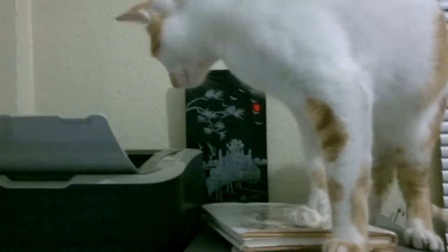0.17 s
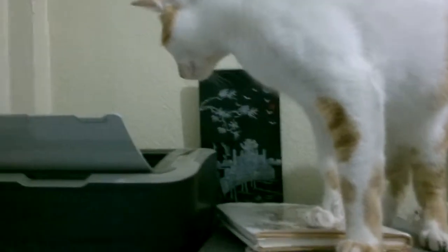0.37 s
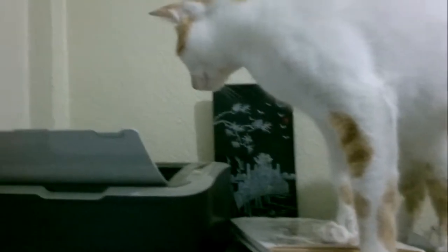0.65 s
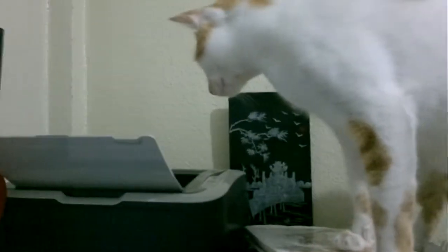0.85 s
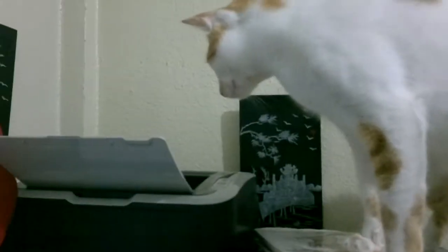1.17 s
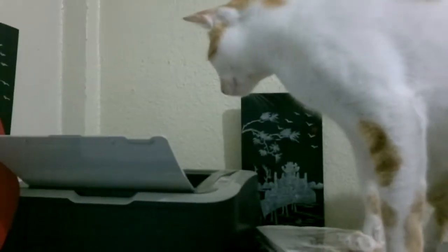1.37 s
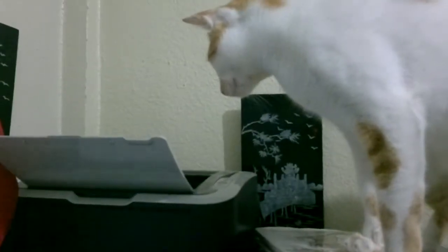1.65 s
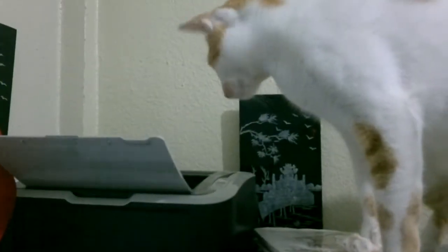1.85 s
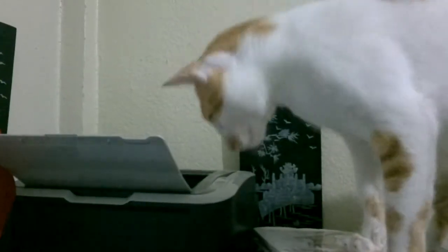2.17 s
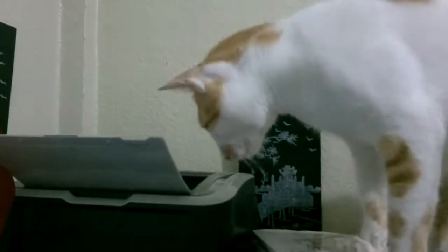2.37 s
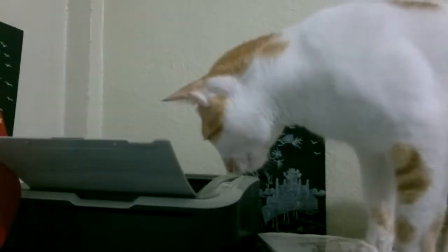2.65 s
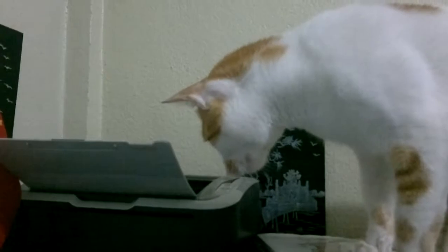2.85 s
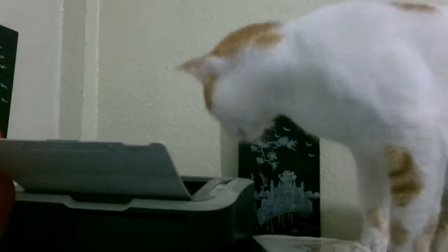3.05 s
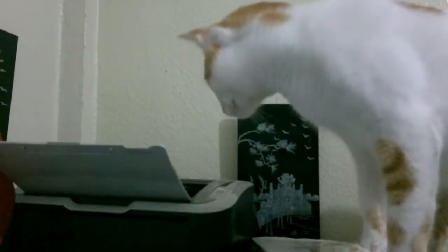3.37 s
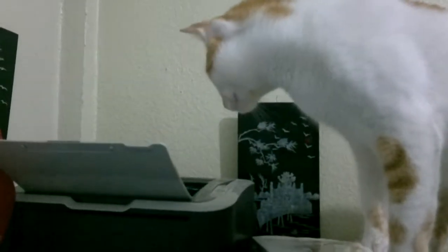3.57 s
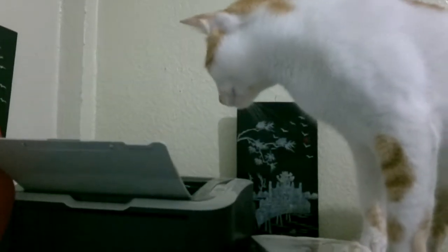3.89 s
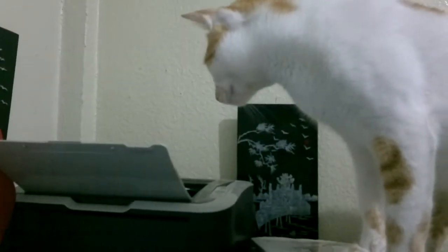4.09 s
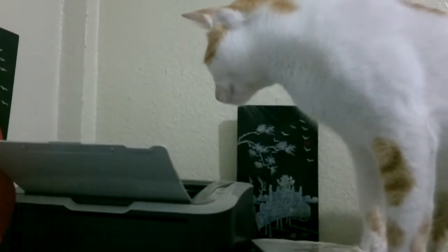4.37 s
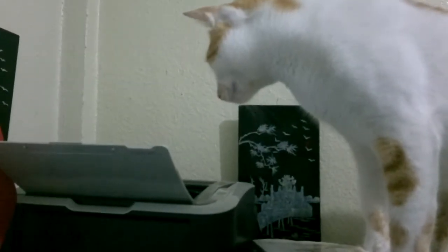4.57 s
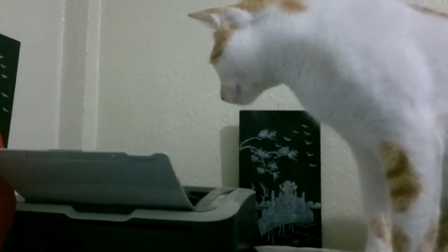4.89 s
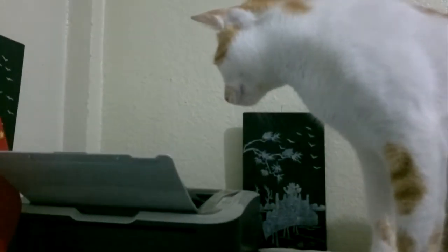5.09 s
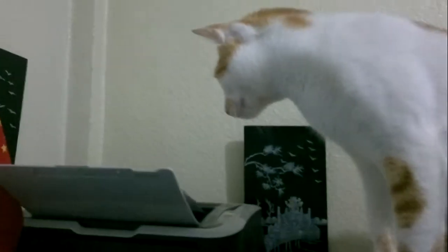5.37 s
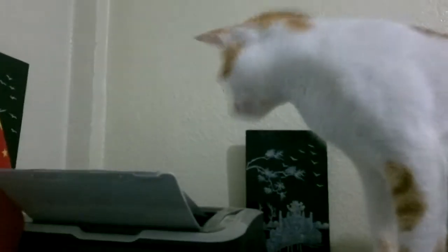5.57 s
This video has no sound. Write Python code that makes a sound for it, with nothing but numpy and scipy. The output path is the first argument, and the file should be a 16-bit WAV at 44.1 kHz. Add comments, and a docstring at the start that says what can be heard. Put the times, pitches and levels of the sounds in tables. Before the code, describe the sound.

Steady fan rush and gear whir from a desktop printer, with a short rising motor whine, plastic clicks, paper rubs and a brief scrape.

```python
"""In a small room, a desktop laser printer starts a job close to a pair of microphone ports.
Fan, gears and rollers are shaped noise and steady tones; the motor winds up as a rising tone.
Clutches, levers, gear teeth and the sheet's edge clack or tick as noise bursts that ring the
plastic case, and a small spring pings. The sheet rubs and scrapes as noise while it is dragged in;
low tones of the case swell, and handling noise adds soft bumps."""
import sys
import numpy as np
from scipy import signal
from scipy.fft import rfft, irfft
from scipy.io import wavfile

SR = 44100
rng = np.random.default_rng(int(sys.argv[2]) if len(sys.argv) > 2 else 0)


def output_pcm(signal):
    """Save a mono or channel-first signal as 16-bit PCM at the path in sys.argv[1].

    Samples are clipped to [-1, 1] before scaling.
    """
    pcm = np.clip(np.atleast_2d(signal).T, -1, 1) * 32767
    wavfile.write(sys.argv[1], SR, np.round(pcm).astype(np.int16))


N = 252693
TIME = np.arange(N) / SR
FREQS = np.maximum(np.arange(N // 2 + 1) * SR / N, 1)

# Noise colours of air rush, gear whir and roller hiss: (frequency [Hz], level per Hz [dB])
AIR_COLOUR = [(25, -21), (70, -33), (110, -20.5), (150, -16.5), (205, -13.5), (270, -3), (360, -4),
              (500, -3), (720, -4), (950, -8), (1320, -15), (1620, -22), (2600, -22)]
WHIR_COLOUR = [(1000, 1.5), (1620, -1), (1780, -1.5), (2100, -1), (2650, -7), (3000, 3), (4400, 0.5),
               (5000, -7), (6000, -10), (7500, -22)]
HISS_COLOUR = [(6000, -5.5), (8000, 3), (11000, 3.5), (15500, -8)]
# Noise colours of the sliding sheet and of its edge: (frequency [Hz], level per Hz [dB])
PAPER_COLOUR = [(600, 13), (1000, 12.5), (2300, 3), (3300, 11.5), (4400, 5), (5300, -8), (6500, -10.5),
                (8000, -30)]
PAPER_EDGE_COLOUR = [(4500, 8.5), (6500, 6.5), (9000, 3), (12000, -1), (15500, -11)]
# Noise colours of the three parts of a clack: (frequency [Hz], level per Hz [dB])
KNOCK_COLOUR = [(150, -59), (340, 3), (600, 3.5), (900, 8), (1350, 4), (1850, -1), (2500, -26)]
CRACK_COLOUR = [(1300, 0), (2000, 4), (2600, 2.5), (3200, 7.5), (4200, 5.5), (5200, -10), (6400, -11.5),
                (8000, -36)]
SNAP_COLOUR = [(5000, 13.5), (7000, 7), (8500, 1.5), (10500, 1.5), (13000, -5), (15500, -16)]
# Noise colours of a handling bump, deep and hollow: (frequency [Hz], level per Hz [dB])
DEEP_COLOUR = [(22, -23), (45, 8), (90, -6), (160, 0)]
HOLLOW_COLOUR = [(140, -16), (300, 6.5), (500, -3), (800, 2)]

# Gear mesh and motor steps: (multiple of MESH_HZ [-], relative level [dB])
MESH_ORDERS = [(2, -52.5), (3, -47), (6, -53.5), (12, -65), (30, -66), (36, -71)]
# Steady tones of fan and bearings: (frequency [Hz], level [dB])
FAN_TONES = [(360.3, -50.5), (585, -42.5)]
# Thin whines of the scanner: (frequency [Hz], level before SCANNER_DB [dB])
SCANNER_TONES = [(4678, -67), (10928, -73), (12189, -73.5)]
# Low tones of the case: (frequency [Hz], crest level [dB], crest time [s], swell rate [dB/s])
DRONE_TONES = [(59.5, -55.5, 5.2, 5.5), (85.3, -51, 5.42, 37), (137.6, -63, 5, 6), (191.4, -56.5, 6.2, 1.5)]
# Load on the gear train, read against WORKING_DB: (time [s], level [dB])
GEAR_LOAD = [(0.62, -48.5), (1.25, -48), (1.4, -47), (1.89, -39.5), (2.06, -45), (4.63, -42), (5.05, -46),
             (5.49, -46), (5.73, -44)]

# Clutches, levers and gear teeth catching, and ticks of the sheet's edge, levels relative within
# each part: (time [s], crack [dB], knock [dB], snap [dB], pitch of struck part [Hz],
# basic chatter t60 [s])
CLACKS = [(0.5254, -18, -21.5, -48, 860, 0.027), (0.543, -26.5, -28, -54, 600, 0.06),
          (1.2135, -19, -17, -37, 930, 0.024), (1.2281, -13.5, -15, -34.5, 1084, 0.023),
          (1.294, -24, -27.5, -46, 960, 0.023), (1.3145, -30, -28, -32, 930, 0.011),
          (1.4195, -20, -20.5, -29, 950, 0.016), (1.426, -36, -25.5, -48, 970, 0.011),
          (1.6932, -29, -20.5, -44, 942, 0.041), (1.928, -25, -31, -42, 3480, 0.039),
          (1.9521, -18, -13, -41, 966, 0.039), (1.9805, -8.5, -16, -33, 856, 0.03),
          (1.9912, -10, -12, -23.5, 845, 0.019), (3.3458, -29, -25, -63, 687, 0.11),
          (4.241, -23, -22, -42, 1690, 0.016), (4.2925, -14.5, -17, -44, 1790, 0.028),
          (4.333, -16, -22, -34, 1900, 0.032), (4.3688, -17.5, -18, -36, 945, 0.014),
          (4.522, -24, -28, -37.5, 5030, 0.038), (4.598, -21, -24, -39, 4900, 0.024),
          (4.661, -21, -27, -38, 1300, 0.054), (4.681, -18, -24.5, -35, 1500, 0.029),
          (4.735, -26, -48, -43, 1300, 0.027), (5.5655, -16, -26, -37.5, 2870, 0.053),
          (5.587, -19, -28, -35.5, 765, 0.056), (5.639, -22, -25, -49, 677, 0.031),
          (5.7141, -26.5, -26, -48, 1550, 0.03)]
# Ringing modes of the plastic case: (frequency [Hz], relative level [dB], t60 [s])
CASE_MODES = [(376.5, -14, 0.23), (575, -22.5, 0.31), (664, -19, 0.22), (843, -13.5, 0.15),
              (947, -19.5, 0.17), (1082, -18.5, 0.087), (1335, -17, 0.19), (1510, -20.5, 0.13),
              (1820, -13.5, 0.11), (2175, -26, 0.25), (2680, -25, 0.12), (3580, -38, 0.18),
              (4590, -21.5, 0.14)]
# A small spring pings as a lever flips: (time [s], strength [dB])
SPRING_PINGS = [(4.526, -26.5), (4.668, -24), (4.7365, -24)]
# Ringing modes of that spring: (frequency [Hz], relative level [dB], t60 [s])
SPRING_MODES = [(3870, -7.5, 0.059), (3910, -12.5, 0.12), (3930, -14.5, 0.24), (4400, -17, 0.087)]
# Panel resonances that the motor sweeps through: (frequency [Hz], width [Hz], lift [dB])
PANELS = [(310, 6.8, 10), (410, 22, 9.5), (530, 88, 7)]
# The sheet rubs on the rollers, levels before the slide level and ticks: (firmest grip [s],
# rise [s], fade [s], rub [dB], edge hiss [dB], rasp [dB], rasp pitch [Hz])
RUBS = [(0.388, 0.015, 0.032, -37, -54.5, -54, 3680), (1.335, .004, .008, -44, -38, -36, 3500),
        (1.345, 0.051, 0.096, -28.5, -38.5, -35.5, 4310), (1.592, 0.005, 0.017, -39, -54, -42, 6100),
        (1.64, .1, 0.16, -40.5, -48, -52, 3770), (1.697, 0.017, 0.028, -33, -59, -46, 3710),
        (1.743, 0.007, 0.014, -40, -47, -36, 3830), (1.847, 0.0043, 0.012, -45, -47, -33, 3590),
        (1.869, 0.0067, 0.032, -31, -44, -35.5, 3480), (3.015, 0.036, 0.057, -35.5, -70, -54, 3860),
        (4.687, 0.021, 0.024, -47, -40.5, -43, 5980)]
# The hand shifts on the microphone: (time [s], deep level [dB], hollow level [dB], length [s])
BUMPS = [(0.394, -49, -35.5, 0.038), (0.574, -48.5, -33, 0.041), (0.875, -49, -41, 0.036),
         (4.855, -47, -54, 0.034)]

# Balance of the two ports: (frequency [Hz], left minus right [dB])
STEADY_BALANCE = [(60, -6.5), (250, -4.5), (900, -4), (1900, -1.5), (3100, -9), (4200, -1.5), (5300, 9),
                  (7000, 10), (12000, 23.5)]
CLACK_BALANCE = [(250, -1.5), (1000, -4), (1900, 0), (3000, -8), (4800, 0.5), (6800, -0.5), (9000, 5),
                 (13000, 14)]
# How alike spread-out sound is at the two ports: (frequency [Hz], likeness [0 to 1])
LIKENESS = [(30, .55), (100, .8), (300, .94), (850, .89), (1300, .65), (1800, .45), (2300, .68), (3300, .3),
            (4100, .45), (6000, .2), (12000, .05)]
# How much earlier sound reaches the left port: (frequency [Hz], lead [ms])
PORT_LEAD = [(300, 0.11), (1200, 0.095), (2200, 0.19), (4000, 0.244)]

ROOM_T60_S, ROOM_DB = 0.19, 3.5
CUTOFF_HZ, PANEL_CUT_HZ = 15800, 260
# The load starts idle and rises to the load table, getting there as the motor starts.
WORKING_DB, IDLE_DB, TAKE_UP_S = -42.5, -58, 0.29
# "Follows" is the share of the load's swing, in dB, that a level takes on.
AIR_DB, AIR_FOLLOWS = -37, 0.08
MESH_HZ, MESH_DB, MESH_FOLLOWS = 140.1, 6, 0.73
SCANNER_DB, SCANNER_SPIN_UP_S = 1, 1.6
DRONE_IDLE_DB = -22.5  # lowest level, relative to the crest
FAN_HISS_HZ, FAN_HISS_WIDTH_HZ, FAN_HISS_DB = 5110, 900, -59.5
FAN_HISS_SAG_HZ_PER_S, FAN_HISS_SAG_S = 490, 0.56
# The motor starts, labours at its lowest pitch, then gains speed until the gears run steadily.
MOTOR_ON_S, SPEED_UP_S, AT_SPEED_S, SETTLE_S = 0.575, 0.613, 0.86, 0.12
START_HZ, RISE_HZ_PER_S, RUN_UP_DB = 312, 1700, -42
EDGE_SHARPNESS, RASP_WIDTH_HZ = 0.96, 520  # edge hiss rises as this power of the grip
KNOCK_NOISE_DB, STIFF_MODES_HZ = -6.5, 2500
PART_DB, PART_T60_CYCLES = 4, 42
SCRAPE_S, SCRAPE_LENGTH_S, SCRAPE_DB = 4.503, 0.162, -34.5
SCRAPE_HZ, SCRAPE_END_HZ, SCRAPE_SAG_S, SCRAPE_WIDTH_HZ = 1180, 830, 0.055, 190


def from_db(db):
    """Turn decibels into gain."""
    return 10 ** (np.asarray(db) / 20)


def rms_one(x):
    """Scale a sound to an rms (average strength) of one."""
    return x / np.sqrt(np.mean(x ** 2) + 1e-20)


def in_time(rows):
    """Read each column of a timed table at every sample."""
    s, *columns = np.transpose(rows)
    return [np.interp(TIME, s, column) for column in columns]


def over_hz(points):
    """Read a table at every frequency, on a log axis."""
    hz, value = np.transpose(points)
    return np.interp(np.log(FREQS), np.log(hz), value)


def drift(rate):
    """Random wander of rms one: `rate` new values a second, held once all 2000 are used."""
    knots = rng.standard_normal(2000)
    return rms_one(np.interp(TIME * rate, np.arange(len(knots)), knots))


def noise(spectrum, grain_db=0):
    """Two unrelated noises of one colour, steep beyond its ends; uneven sample sizes add grit."""
    grain = from_db(grain_db * np.minimum(rng.exponential(1, N), 6))
    white = rng.standard_normal((2, N)) * grain
    low_edge = np.minimum(FREQS / spectrum[0][0], 1) ** 3
    high_edge = np.minimum(spectrum[-1][0] / FREQS, 1) ** 4
    return rms_one(irfft(rfft(white) * from_db(over_hz(spectrum)) * low_edge * high_edge, N))


def resonant_noise(hz, width_hz, order=2):
    """Noise of rms one in a resonance whose centre may move."""
    low = signal.butter(order, width_hz / 2, fs=SR, output="sos")
    a, b = signal.sosfilt(low, rng.standard_normal((2, N)))
    turn = 2 * np.pi * np.cumsum(hz * np.ones(N)) / SR
    return rms_one(a * np.cos(turn) + b * np.sin(turn))


def sine(hz):
    """A tone of rms one along a pitch curve."""
    return np.sqrt(2) * np.sin(2 * np.pi * (np.cumsum(hz) / SR + rng.random()))


def tones(lines, wobble, flutter_db):
    """Tones of one shaft share its wobble in speed but flutter in level on their own."""
    speed = 1 + wobble * drift(12)
    return sum(from_db(db + flutter_db * drift(9)) * sine(hz * speed) for hz, db in lines)


def ring(clicks, hz, t60):
    """Each click sets off a dying sine; a click of one starts it at a height of one."""
    r = from_db(-60 / (t60 * SR))
    w = 2 * np.pi * hz / SR
    return signal.lfilter([0, np.sin(w)], [1, -2 * r * np.cos(w), r * r], clicks + 1e-18)


def gate(start, end, attack_s, release_s):
    """Fade in, hold and fade out between two times."""
    return np.clip(np.minimum((TIME - start) / attack_s, (end - TIME) / release_s), 0, 1)


def walls(x, echo_db=-18, count=6):
    """Weak echoes off the desk and near walls strengthen some pitches of a noise, weaken others."""
    lags = (rng.uniform(0.009, 0.03, count) * SR).astype(int)
    echoes = sum(np.roll(x, lag, axis=-1) for lag in lags)
    return rms_one(x + from_db(echo_db) * echoes)


def radiated(x):
    """Small plastic panels give off hardly any bass."""
    return signal.sosfilt(signal.butter(3, PANEL_CUT_HZ, "high", fs=SR, output="sos"), x)


def ports(diffuse, direct, balance):
    """Sound reaches the left port first; ports agree most at 300 to 850 Hz, least in the treble."""
    alike = np.clip(over_hz(LIKENESS), 0, 0.99)  # lower again in the deep bass
    tilt = from_db(over_hz(balance) / 2)
    turn = 2 * np.pi * FREQS * over_hz(PORT_LEAD) / 1000  # ms to s
    shared, own = rfft(diffuse)
    point = rfft(direct)
    left_mix = point + alike * shared + np.sqrt(1 - alike ** 2) * own
    left = left_mix * np.exp(1j * turn) * tilt
    right = (point + shared) / tilt
    # Keeps the colour of the two ports' average even.
    centre = np.sqrt(tilt ** 2 + tilt ** -2 + 2 * alike * np.cos(turn)) / 2
    return irfft(np.array([left, right]) / centre, N)


def load_db():
    """The gear train's load, relative to its working level."""
    engaged = np.clip((TIME - MOTOR_ON_S) / TAKE_UP_S + 1, 0, 1)
    return IDLE_DB + engaged * (in_time(GEAR_LOAD)[0] - IDLE_DB) - WORKING_DB


def running_noise(whir_db=-42.0, hiss_db=-59, hiss_full_db=2.5, hiss_follows=0.55, flutter_db=1.83):
    """Air rushes through the case; under load, gears whir with fine grit and rollers hiss."""
    load = load_db()
    air_level_db = AIR_DB + AIR_FOLLOWS * load + 0.5 * drift(25)
    air = from_db(air_level_db) * walls(noise(AIR_COLOUR))
    whir_level_db = whir_db + load + 0.5 * drift(66) + flutter_db * drift(12)
    whir = from_db(whir_level_db) * walls(noise(WHIR_COLOUR, grain_db=1.5))
    # The hiss stops growing once the load is hiss_full_db above working level.
    hiss_level_db = hiss_db + hiss_follows * np.minimum(load - hiss_full_db, 0)
    hiss = from_db(hiss_level_db) * walls(noise(HISS_COLOUR))
    return air + whir + hiss + fan_hiss()


def fan_hiss():
    """A soft, narrow band of fan hiss sinks a little in pitch and settles."""
    hz = FAN_HISS_HZ - FAN_HISS_SAG_HZ_PER_S * np.minimum(TIME, FAN_HISS_SAG_S)
    pair = np.array([resonant_noise(hz, FAN_HISS_WIDTH_HZ, order=3) for _ in range(2)])
    return from_db(FAN_HISS_DB) * pair


def motors():
    """The fan is steady, gear tones follow the load, scanner whines fade in and the case drones."""
    mesh_lines = [(k * MESH_HZ, db) for k, db in MESH_ORDERS]
    mesh = tones(mesh_lines, wobble=0.0005, flutter_db=1.3)
    fan = tones(FAN_TONES, wobble=0.0006, flutter_db=0.6)
    scanner = tones(SCANNER_TONES, wobble=0.0003, flutter_db=1.2)
    settled = np.clip((TIME - AT_SPEED_S) / SETTLE_S, 0, 1)
    meshing = settled * from_db(MESH_DB + MESH_FOLLOWS * load_db())
    spinning = np.minimum(TIME / SCANNER_SPIN_UP_S, 1) ** 2 * from_db(SCANNER_DB)
    return fan + meshing * mesh + spinning * scanner + drone()


def drone(rumble_db=-3, width_hz=24):
    """Low case tones swell as the sheet is pulled in, then sink, broken up by rumble near their pitch."""
    out = 0
    for hz, db, crest_s, db_per_s in DRONE_TONES:
        swell = from_db(np.maximum(-db_per_s * np.abs(TIME - crest_s), DRONE_IDLE_DB))
        tone = tones([(hz, db)], wobble=0.0182, flutter_db=3)
        rumble = from_db(db + rumble_db) * resonant_noise(hz, width_hz)
        out = out + swell * (tone + rumble)
    return out


def paper(slip_db=1.1, slide_db=-2.8, catches_per_s=110, catch_db=-2, catch_s=0.0019):
    """The sheet grips, slides with edge hiss and a narrow rasp, catches in ticks, and eases off."""
    rub = noise(PAPER_COLOUR, grain_db=3)
    edge = noise(PAPER_EDGE_COLOUR, grain_db=2.8)
    catches = (rng.random(N) < catches_per_s / SR) * rng.uniform(0.28, 0.74, N)
    ticks = signal.lfilter([1], [1, -np.exp(-1 / (catch_s * SR))], catches + 1e-18)
    slips = from_db(slide_db + slip_db * drift(260)) + from_db(catch_db) * ticks
    out = 0
    for s, rise_s, fade_s, rub_db, edge_db, rasp_db, rasp_hz in RUBS:
        rising = ((TIME - s) / rise_s) ** 2
        fading = np.abs((TIME - s) / fade_s) ** 1.7
        grip = np.exp(-np.minimum(np.where(TIME < s, rising, fading), 20))
        rasp = np.array([resonant_noise(rasp_hz, RASP_WIDTH_HZ) for _ in range(2)])
        out = out + grip * (from_db(rub_db) * rub + from_db(rasp_db) * rasp)
        out = out + from_db(edge_db) * grip ** EDGE_SHARPNESS * edge
    return slips * out


def bumps():
    """Soft swells of handling noise: a deep thud and a hollow rub."""
    deep, hollow = noise(DEEP_COLOUR), noise(HOLLOW_COLOUR)
    out = 0
    for s, deep_db, hollow_db, length_s in BUMPS:
        swell = np.exp(-((TIME - s) / length_s) ** 2)
        out = out + (from_db(deep_db) * deep + from_db(hollow_db) * hollow) * swell
    return out


def clack_envelope(levels_db, rise_s, stretch):
    """Each contact chatters briefly; the longer it lasts, the more it fills the room."""
    energy = np.zeros(N)
    for (s, *_, t60), db in zip(CLACKS, levels_db):
        start, chatter_s = int(s * SR), stretch * t60
        t = TIME[:min(SR // 2, N - start)]
        contact = from_db(-60 * t / chatter_s)
        room = from_db(ROOM_DB - 60 * t / ROOM_T60_S)
        attack = from_db(db) * (1 - np.exp(-t / rise_s))
        decay = contact ** 2 + room ** 2 * chatter_s / ROOM_T60_S
        energy[start:start + len(t)] += attack ** 2 * decay
    return np.sqrt(energy)


def clacks():
    """Every contact gives a dull knock, a hard crack and a short bright snap of noise."""
    _, crack_db, knock_db, snap_db, _, _ = np.transpose(CLACKS)
    knock_level = clack_envelope(knock_db + KNOCK_NOISE_DB, rise_s=0.0022, stretch=1.0)
    crack_level = clack_envelope(crack_db - 8.5, rise_s=0.00093, stretch=1.25)
    snap_level = clack_envelope(snap_db + 1.0, rise_s=0.00035, stretch=1.0)
    knock = knock_level * noise(KNOCK_COLOUR)
    crack = crack_level * noise(CRACK_COLOUR, grain_db=1.5)
    snap = snap_level * noise(SNAP_COLOUR, grain_db=2.5)
    return knock + crack + snap


def struck_parts(rise_s=0.0034):
    """The part that is hit rings at its own pitch for a few dozen cycles."""
    out, t = np.zeros(N + SR), TIME[:SR // 2]
    for s, _, knock_db, _, hz, _ in CLACKS:
        decay = from_db(-60 * t * hz / PART_T60_CYCLES)
        level = from_db(knock_db + PART_DB) * decay * (1 - np.exp(-t / rise_s))
        out[int(s * SR):][:len(t)] += level * np.sin(2 * np.pi * hz * t)
    return out[:N]


def case_ring(ring_db=2.0, loss_db_per_octave=5, reference_chatter_s=0.069):
    """Knocks ring the case most near the struck part's pitch; cracks ring its stiff, high modes."""
    s, crack_db, knock_db, _, part_hz, chatter_s = np.transpose(CLACKS)
    crack_energy_db = crack_db + 10 * np.log10(chatter_s / reference_chatter_s)
    luck = rng.standard_normal((len(s), len(CASE_MODES), 2))  # level and delay of each blow
    out = np.zeros(N)
    for k, (hz, db, t60) in enumerate(CASE_MODES):
        if hz > STIFF_MODES_HZ:
            blow_db = crack_energy_db
        else:
            blow_db = knock_db - loss_db_per_octave * np.abs(np.log2(hz / part_hz))
        clicks = np.zeros(N)
        at = ((s + 0.001 * np.abs(luck[:, k, 1])) * SR).astype(int)
        clicks[at] = from_db(blow_db + db + ring_db + luck[:, k, 0])
        out += ring(clicks, hz, t60)
    return out


def run_up(upper_ratio=1.6, upper_db=0, panel_hz=680, width_hz=42, fade_s=0.017):
    """The motor shudders as it speeds up, swelling at panel resonances; a second gear sings at one."""
    hz = START_HZ + RISE_HZ_PER_S * np.clip(TIME - SPEED_UP_S, 0, AT_SPEED_S - SPEED_UP_S)
    lifts_db = sum(lift_db * np.exp(-((hz - centre) / width) ** 2) for centre, width, lift_db in PANELS)
    singing = from_db(upper_db) / (1 + ((hz * upper_ratio - panel_hz) / width_hz) ** 2)
    shaky_hz = hz * (1 + 0.028 * drift(350))
    level = from_db(RUN_UP_DB + lifts_db + 2.2 * drift(140))
    running = gate(MOTOR_ON_S, AT_SPEED_S, fade_s, fade_s)
    return running * level * (sine(shaky_hz) + singing * sine(shaky_hz * upper_ratio))


def scrape(attack_s=0.025, release_s=0.013, rough_db=2):
    """Rough friction in one narrow resonance drops in pitch and settles as the sheet is pulled in."""
    sag = np.exp(-np.maximum(TIME - SCRAPE_S, 0) / SCRAPE_SAG_S)
    hz = SCRAPE_END_HZ + (SCRAPE_HZ - SCRAPE_END_HZ) * sag
    friction = rms_one(resonant_noise(hz, SCRAPE_WIDTH_HZ) * from_db(rough_db * drift(160)))
    rubbing = gate(SCRAPE_S, SCRAPE_S + SCRAPE_LENGTH_S, attack_s, release_s)
    return from_db(SCRAPE_DB) * rubbing * friction


def spring(spread_db=5.0):
    """Each flip sets the spring's close modes ringing, so that they beat against each other."""
    clicks = np.zeros(N)
    for s, db in SPRING_PINGS:
        clicks[int(s * SR)] = from_db(db)
    out = 0
    for hz, db, t60 in SPRING_MODES:
        # This drift is already holding when the pings come: one random level per mode.
        out = out + from_db(db + spread_db * drift(500)) * ring(clicks, hz, t60)
    return out


def scene():
    """The steady machine and the paper path, as the two ports hear them."""
    machine = ports(running_noise() + bumps(), motors() + run_up(), STEADY_BALANCE)
    ringing = case_ring() + struck_parts() + spring() + scrape()
    paper_path = ports(clacks() + paper(), ringing, CLACK_BALANCE)
    return machine + radiated(paper_path)


def record(dry):
    """The treble above the cutoff is cut steeply."""
    return signal.sosfilt(signal.ellip(10, 0.2, 80, CUTOFF_HZ, fs=SR, output="sos"), dry)


dry = scene()
out = record(dry)
output_pcm(out)
```